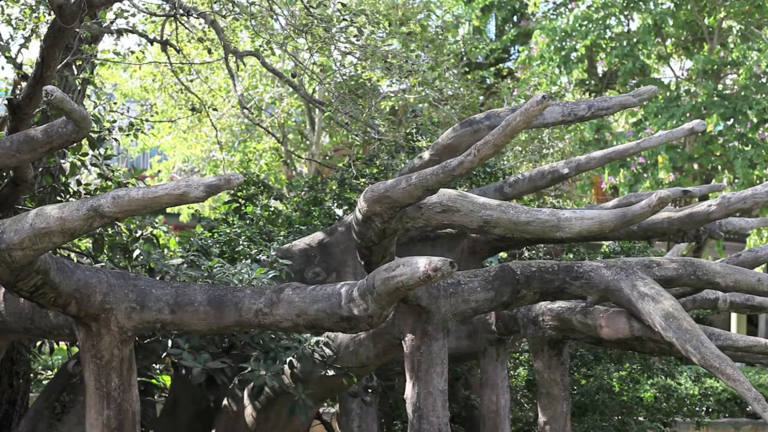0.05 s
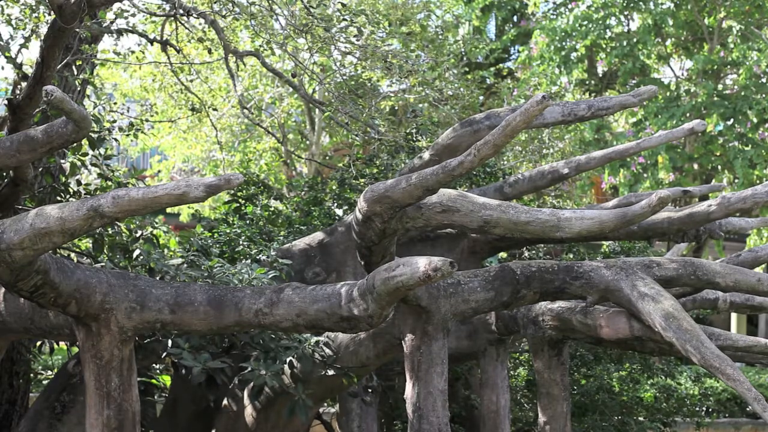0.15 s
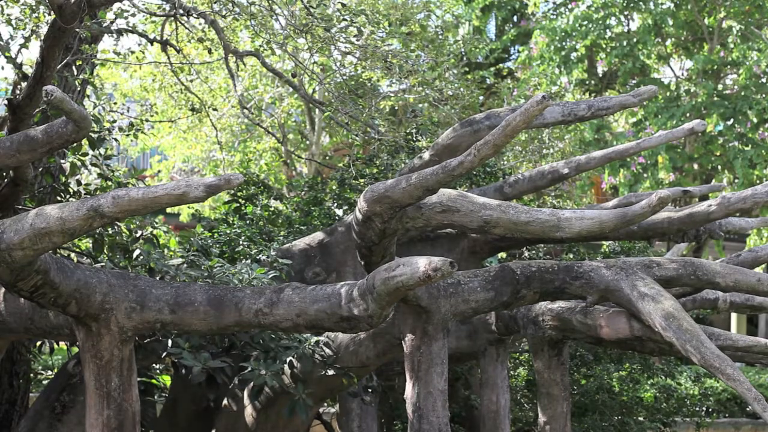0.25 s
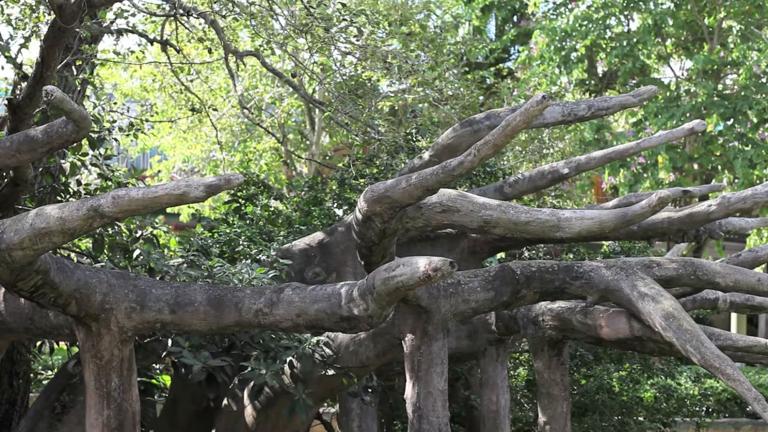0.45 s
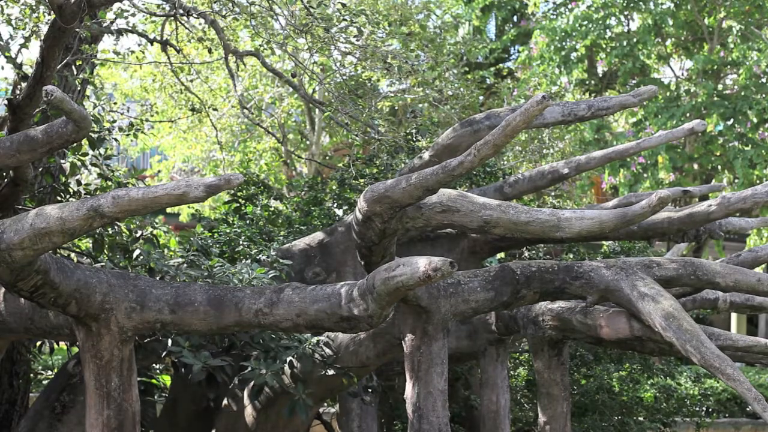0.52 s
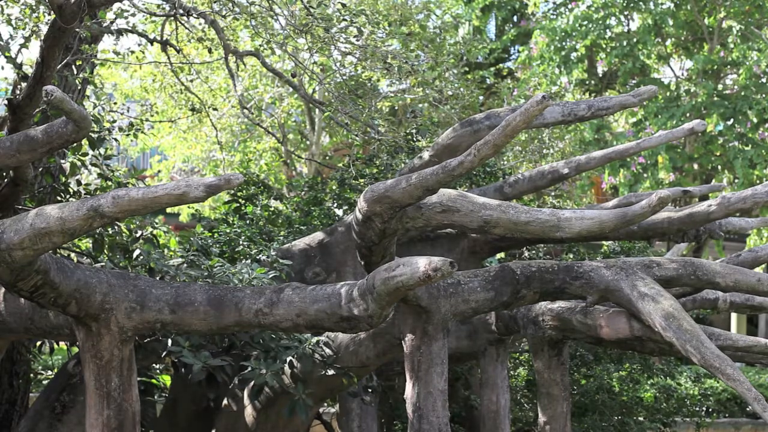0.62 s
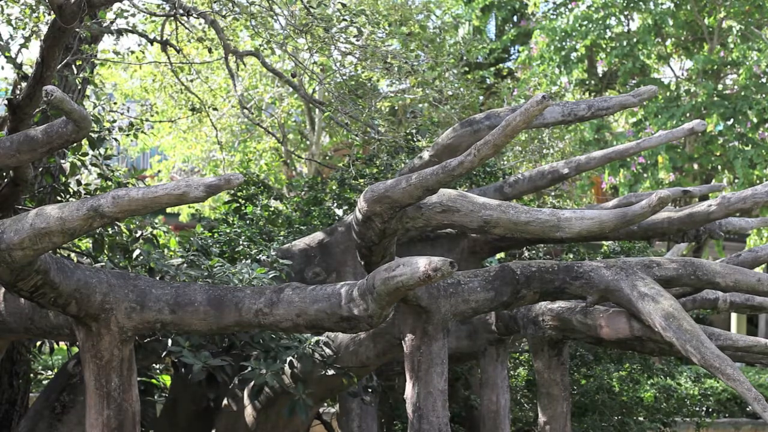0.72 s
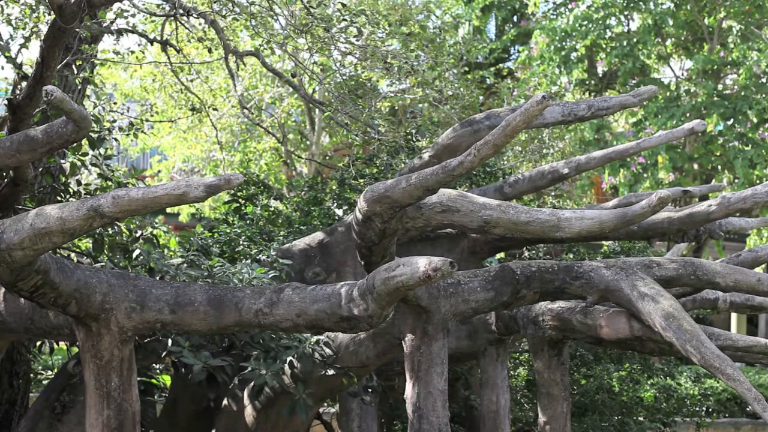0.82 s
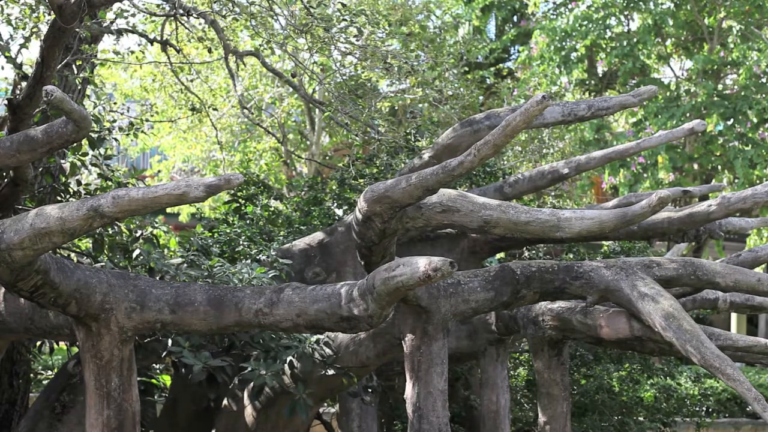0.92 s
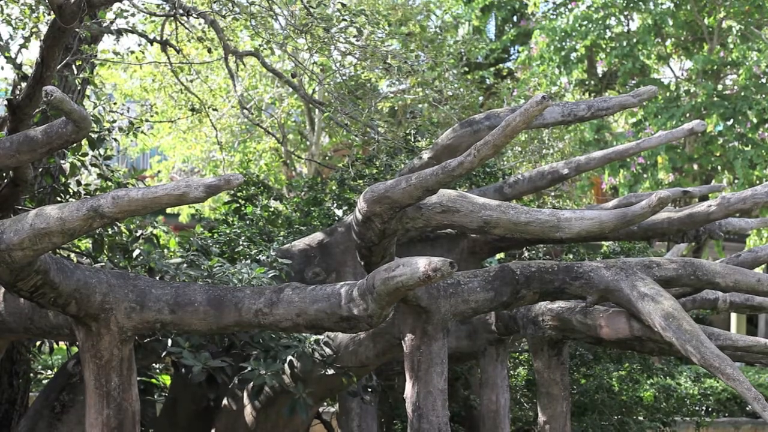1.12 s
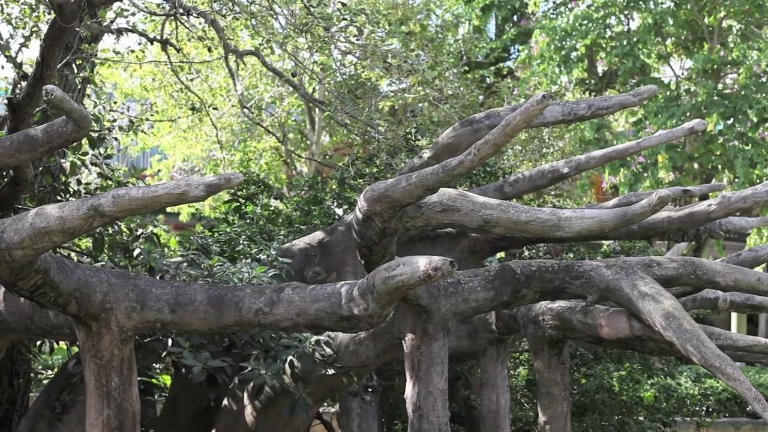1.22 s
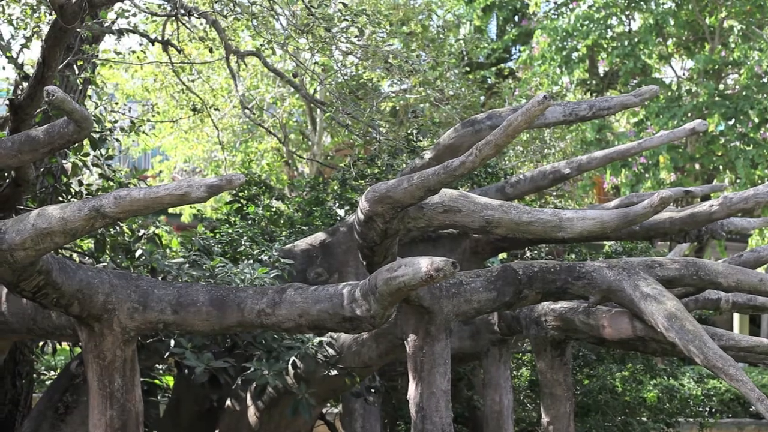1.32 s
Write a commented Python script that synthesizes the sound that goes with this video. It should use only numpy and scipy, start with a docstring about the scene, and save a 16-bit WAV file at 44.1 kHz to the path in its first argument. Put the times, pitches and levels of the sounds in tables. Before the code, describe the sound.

Two quick hoot-and-bark calls from a monkey or ape ring out through quiet woods.

```python
"""A primate calls among trees: a pure low hoot, a sharp bark, a lower hoot and a second bark.
The hoots are nearly sinusoidal; the barks are vocal-fold pulses filtered by throat and mouth, arching
in pitch and turning hoarse as they fall. Trunks and foliage scatter the sound into a long tail, in
which an earlier call is still dying away at the start. Leaves rustle, a thin high chip sounds and
twigs tap over a quiet outdoor hush."""
import sys
import numpy as np
from scipy import signal
from scipy.fft import rfft, irfft
from scipy.io import wavfile
from scipy.ndimage import uniform_filter1d

SR = 44100
rng = np.random.default_rng(int(sys.argv[2]) if len(sys.argv) > 2 else 0)


def int16_out(signal):
    """Quantize to a 16-bit WAV file."""
    q = np.round(np.clip(np.atleast_2d(signal).T, -1, 1) * 32767)
    wavfile.write(sys.argv[1], SR, q.astype(np.int16))


N = 59535
TIME = np.arange(-SR, N) / SR  # starts 1 s early, so that echoes are already sounding at zero
CUTOFF_HZ = 15700


def from_db(db):
    """Amplitude ratio of a level in decibels."""
    return 10 ** (np.asarray(db) / 20)


def unit_rms(x):
    """Normalisation to unit root-mean-square amplitude."""
    return x / np.sqrt(np.mean(x ** 2) + 1e-20)


def at_hz(points, hz):
    """Linear interpolation on a log-frequency axis."""
    freqs, values = np.transpose(points)
    return np.interp(np.log(np.maximum(hz, 1)), np.log(freqs), values)


def contours(rows):
    """Linear interpolation in time: a smoothed gate spanning the rows, then each column's contour."""
    times, *columns = np.transpose(rows)
    gate = uniform_filter1d(((TIME > times[0]) & (TIME < times[-1])) * 1., size=129)
    return [gate] + [np.interp(TIME, times, column) for column in columns]


def coloured(x, spectrum):
    """Minimum-phase filtering: folding the cepstrum gives a causal response with this spectrum."""
    size = 4096
    gain = from_db(at_hz(spectrum, np.fft.rfftfreq(size, 1 / SR)))
    cepstrum = irfft(np.log(gain))
    cepstrum[1:size // 2] *= 2
    cepstrum[size // 2 + 1:] = 0
    return signal.fftconvolve(x, irfft(np.exp(rfft(cepstrum))))[:len(x)]


def fluctuation(hz):
    """Random modulation: low-passed noise of unit rms."""
    lowpass = signal.butter(4, hz, "low", fs=SR, output="sos")
    return unit_rms(signal.sosfilt(lowpass, rng.standard_normal(len(TIME))))


def shaped_noise(spectrum):
    """Spectral shaping of white noise, at unit rms."""
    return unit_rms(coloured(rng.standard_normal(len(TIME)), spectrum))


# ambient noise spectrum: (frequency [Hz], relative spectral density [dB])
HUSH_SPECTRUM = [(25, -36), (45, -5), (66, 1.5), (90, -1), (160, -5), (300, -2), (600, -8), (900, -10),
                 (1500, -10), (3500, -16.5), (6000, -16.5), (7200, -16.5), (8500, -26), (10000, -33.5),
                 (15500, -35)]

def hush():
    """Stationary broadband noise: the outdoor background, strongest in the bass."""
    return from_db(-62) * shaped_noise(HUSH_SPECTRUM)


# timbre of the earlier call relative to the first: (frequency [Hz], gain [dB])
EARLIER_TIMBRE = [(330, 0), (600, -1), (1300, 1.5), (2800, 4), (4600, -6), (6500, 2.5), (12000, -6)]

def earlier_call(advance_s=.6, gain_db=2):
    """Time shift: a call like the first hoot and bark ends before zero, leaving only reverberation."""
    call = bark(BARK_1, TRACT_1, RASP_1) + hoot(HOOT_1)
    return from_db(gain_db) * np.interp(TIME + advance_s, TIME, coloured(call, EARLIER_TIMBRE))


def scatter(x, spectrum, t60, delay_s, build_s=0.0022):
    """Diffuse reverberation: dense echoes build up after a delay and decay exponentially in each band."""
    age = np.maximum(np.arange(SR) / SR - delay_s, 0)
    onset = 1 - np.exp(-age / build_s)
    white, hz = rfft(rng.standard_normal(SR)), np.fft.rfftfreq(SR, 1 / SR)
    centres = np.geomspace(200, 14000, 15)
    response = 0
    for centre, share in zip(centres, np.eye(len(centres))):
        band = at_hz(np.c_[centres, share], hz)  # triangular weight around this centre
        decay = from_db(-60 * age / at_hz(t60, centre))
        echoes = unit_rms(irfft(white * band, SR) * onset * decay)
        band_rms = np.sqrt(np.mean(band ** 2) / SR)
        response += from_db(at_hz(spectrum, centre)) * band_rms * echoes
    return signal.fftconvolve(x, response)[:len(x)]


# scattering strength of trunks and canopy: (frequency [Hz], gain [dB])
TRUNK_GAIN = [(300, -9), (650, -8), (1300, -4.5), (2700, -11), (6000, -4), (12000, -8.5)]
CANOPY_GAIN = [(250, -30), (340, -14.5), (650, -14), (1300, -13), (2700, -16), (6000, -13.5), (12000, -14)]
# decay of their echoes: (frequency [Hz], reverberation time [s])
TRUNK_T60 = [(300, 0.51), (1000, 0.26), (6000, 0.27), (12000, 0.16)]
CANOPY_T60 = [(300, 1.2), (650, 0.89), (1300, 1), (3000, 0.76), (7000, 0.71), (12000, 0.31)]

def tree_echoes(x):
    """Multiple scattering: near trunks return a short, early tail, the far canopy a long, later one."""
    trunks = scatter(x, TRUNK_GAIN, TRUNK_T60, delay_s=0.0037)
    canopy = scatter(x, CANOPY_GAIN, CANOPY_T60, delay_s=0.038)
    return trunks + canopy


def breath(swell_s=0.15):
    """Turbulence in the open throat: a faint hiss swells until the first bark breaks out."""
    end = BARK_1[1][0]
    swell = np.clip((TIME - end) / swell_s + 1, 0, 1) * (TIME < end)
    return from_db(-56) * swell * shaped_noise(RASP_2)


# course of each hoot and the short echo that trails it: (time [s], pitch [Hz], level [dB])
HOOT_1 = [(.204, 309.7, -65), (.214, 314.6, -34), (.228, 320.8, -25.5), (.243, 330, -23),
          (.265, 329, -25.5), (.278, 350.7, -24.5), (.291, 346.4, -22.5), (.307, 335.6, -29.5),
          (.322, 361, -36.5), (.342, 340, -52)]
HOOT_2 = [(.346, 287.3, -51), (.360, 259, -35), (.382, 263.5, -30.5), (.411, 275, -29.5),
          (.428, 278.3, -37), (.453, 306, -36.5), (.468, 315, -50)]
# overtones of the relaxed voice: (harmonic number, level re fundamental [dB])
HOOT_HARMONICS = [(2, -35), (3, -44.5), (4, -45), (5, -53), (6, -47), (7, -42)]

def hoot(rows, strain_db=10, strain_at_s=.29, strain_width_s=.016):
    """Nearly sinusoidal phonation: faint overtones rise as the voice tightens for the first bark."""
    gate, hz, db = contours(rows)
    phase = 2 * np.pi * np.cumsum(hz) / SR
    strain = from_db(strain_db * np.exp(-((TIME - strain_at_s) / strain_width_s) ** 2))
    overtones = sum(from_db(level) * np.sin(k * phase) for k, level in HOOT_HARMONICS)
    return np.sqrt(2) * gate * from_db(db) * (np.sin(phase) + strain * overtones)


# course of each bark: (time [s], pitch [Hz], source level [dB],
# relative level of harmonics above the second [dB], roughness [0-1], rasp level [dB])
BARK_1 = [(.299, 564.2, -50, -18, .3, -69), (.308, 595.5, -36, -3, 0.32, -53),
          (.316, 635.4, -24, -10, 0.08, -39), (.324, 664.6, -24, -3, 0.08, -38),
          (.330, 676, -22, 3, 0, -42), (.339, 670.2, -23, -6, 0.2, -33),
          (.347, 646.6, -18, -2.5, 0.14, -26.5), (.354, 608.2, -26, -17, 0.4, -28),
          (.364, 545, -23.5, -18.5, 0.75, -28), (.379, 481.7, -41.5, 5, .7, -40),
          (.395, 448, -39, -21.5, .7, -55)]
BARK_2 = [(.490, 678.1, -48, 6, 0.2158, -69), (.497, 694.7, -25.5, -2.5, 0.14, -48),
          (.508, 700.9, -23.5, -1.5, 0.096, -51), (.522, 698.7, -23.5, 3, 0.068, -55),
          (.533, 669.4, -20.5, -6.5, 0.43, -32.5), (.543, 634, -24, 2, 0.2, -27),
          (.555, 565, -25, -1, 0.44, -23.5), (.574, 525.8, -29.5, -21, 0.8, -30),
          (.584, 472.2, -38, 8, .7, -38), (.606, 405.7, -41.5, 1, 0.51, -50)]
# transfer function of throat and mouth in each bark: (frequency [Hz], gain [dB])
TRACT_1 = [(250, -22.5), (480, 4.5), (660, -1.5), (820, -6.5), (1000, -1.5), (1330, -1), (1560, -19.5),
           (2000, -21), (2300, -25.5), (2680, 2), (3000, -15.5), (3350, -8.5), (4030, -4), (4700, -8.5),
           (5400, -10), (6000, -30.5), (6700, -16), (7400, -13.5), (8500, -22.5), (9800, -35), (12000, -42),
           (15500, -64.5)]
TRACT_2 = [(250, -4.5), (450, 0.5), (700, -1), (850, -17.5), (1050, -1), (1400, -1.5), (1600, -38),
           (2100, -16), (2800, -10), (3500, -21), (4200, -20), (4900, -13.5), (5600, -10), (6300, -13.5),
           (7000, -16), (7750, -13), (8600, -23), (9800, -31.5), (12000, -40.5), (15500, -52)]
# turbulent air in each bark: (frequency [Hz], relative spectral density [dB])
RASP_1 = [(300, -33.5), (1500, -11), (2100, -10), (2600, -9.5), (3200, 1), (4100, 3.5), (5000, -0.5),
          (6000, -0.5), (7300, 0), (8500, -9), (9800, -19), (12000, -24.5), (15500, -56)]
RASP_2 = [(300, -43), (1600, -22.5), (2000, -6), (2400, 3), (3000, 2), (3800, 2), (4700, -2), (5800, 2),
          (7500, 0.5), (8500, -15), (9800, -16), (12000, -34), (15500, -49.5)]
# mouth resonance that stands out as each bark breaks: (time [s], centre [Hz], gain [dB])
MOUTH_FORMANT = [(.338, 3740, 2), (.349, 4120, 7.5), (.358, 4240, 2), (.526, 3590, -1.5), (.540, 3200, 6),
                 (.554, 2490, 8.5), (.572, 2300, 2)]
FORMANT_WIDTH_HZ = 420
JITTER, JITTER_HZ, SHIMMER = 0.0219, 171, 0.37  # unsteadiness of the folds at full roughness
FLUTTER, FLUTTER_HZ = 0.38, 67  # each upper harmonic wavers on its own

def bark(rows, tract, rasp):
    """Source-filter voicing: unsteady fold pulses excite the tract, with a puff of air in each cycle."""
    gate, hz, db, treble_db, roughness, rasp_db = contours(rows)
    _, formant_hz, formant_db = contours(MOUTH_FORMANT)
    jitter = 1 + JITTER * roughness * fluctuation(JITTER_HZ)
    phase = 2 * np.pi * np.cumsum(hz * jitter) / SR
    on = gate > 1e-6
    pulses = np.cos(phase) + np.cos(2 * phase)
    for k in range(3, int(CUTOFF_HZ / hz.max()) + 4):
        boost_db = formant_db[on] * np.exp(-((k * hz[on] - formant_hz[on]) / FORMANT_WIDTH_HZ) ** 2)
        waver = 1 + FLUTTER * fluctuation(FLUTTER_HZ)[on]
        pulses[on] += from_db(treble_db[on] + boost_db) * waver * np.cos(k * phase[on])
    drive = gate * (1 + SHIMMER * roughness * fluctuation(JITTER_HZ / 2))
    voice = coloured(np.sqrt(2) * drive * from_db(db) * pulses, tract)
    puffs = rng.standard_normal(len(TIME)) * (1 + np.cos(phase))
    return voice + drive * from_db(rasp_db) * unit_rms(coloured(puffs, rasp))


# echoes from branches in the path: (delay [s])
BRANCH_DELAYS = [0.00034, .00079, .00127]

def branch_smear(x, feedback=0.41):
    """All-pass dispersion: branches spread each pulse in time and leave its magnitude spectrum intact."""
    for delay_s in BRANCH_DELAYS:
        denominator = np.r_[1, np.zeros(int(delay_s * SR)), -feedback]
        x = signal.lfilter(denominator[::-1], denominator, x + 1e-18)
    return x


# swishes of leaves: (time [s], level [dB], hold [s])
LEAF_SWISHES = [(0.868, -60.5, 0.025), (1.275, -54, 0.035)]
# their spectrum: (frequency [Hz], relative spectral density [dB])
LEAF_SPECTRUM = [(100, 2), (500, -9), (900, -17), (2500, -6.5), (4500, -0.5), (7000, -4.5), (9000, -20),
                 (15000, -45)]

def leaves(attack_s=0.006, t60_s=0.095):
    """Amplitude-modulated noise: each rustle rises quickly, holds and decays exponentially."""
    envelope = 0
    for start, db, hold in LEAF_SWISHES:
        attack = np.clip((TIME - start) / attack_s, 0, 1)
        envelope += attack * from_db(db - 60 * np.maximum(TIME - start - hold, 0) / t60_s)
    return envelope * shaped_noise(LEAF_SPECTRUM)


# a distant chip: (time [s], level [dB])
CHIP_PEAKS = [(1.108, -57)]
# its spectrum: (frequency [Hz], relative spectral density [dB])
CHIP_SPECTRUM = [(4000, -39), (5200, -6), (6600, -6), (8000, -41)]

def chip(width_s=0.0057):
    """Band-limited noise under a Gaussian envelope: a thin high chip, perhaps a small bird."""
    envelope = sum(from_db(db) * np.exp(-((TIME - peak) / width_s) ** 2) for peak, db in CHIP_PEAKS)
    return envelope * shaped_noise(CHIP_SPECTRUM)


# taps of twigs: (time [s], level [dB])
TWIG_TAPS = [(1.244, -54), (1.277, -52.5), (1.337, -53)]
# their spectrum: (frequency [Hz], relative gain [dB])
TWIG_SPECTRUM = [(100, -15), (500, 3.5), (1200, -3), (2000, -1.5), (4000, -25), (8000, -38), (15000, -58)]

def twigs(t60_s=0.017):
    """Damped impacts: each contact is a fast-decaying noise burst, filtered to a dull tap."""
    envelope = sum(from_db(db - 60 * np.abs(TIME - start) / t60_s) * (TIME > start)
                   for start, db in TWIG_TAPS)
    contact = rng.standard_normal(len(TIME))
    return coloured(envelope * contact, TWIG_SPECTRUM) / np.std(coloured(contact, TWIG_SPECTRUM))


def scene():
    """Superposition of the calls, their reverberation and the quiet sounds around them."""
    barks = branch_smear(bark(BARK_1, TRACT_1, RASP_1) + bark(BARK_2, TRACT_2, RASP_2))
    calls = barks + hoot(HOOT_1) + hoot(HOOT_2) + breath()
    echoes = tree_echoes(calls + earlier_call())
    mix = calls + echoes + leaves() + twigs() + chip() + hush()
    return mix[None, -N:]


def record(dry):
    """Band limiting: an elliptic low-pass filter cuts the highest treble steeply."""
    return signal.sosfilt(signal.ellip(10, .1, 80, CUTOFF_HZ, fs=SR, output="sos"), dry)


dry = scene()
out = record(dry)
int16_out(out)
```